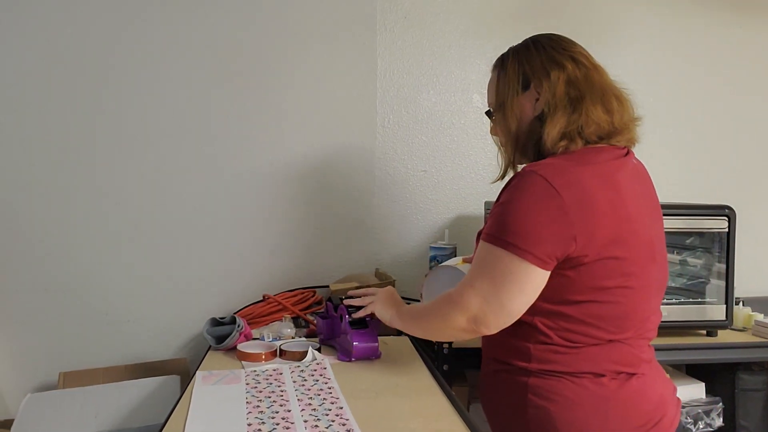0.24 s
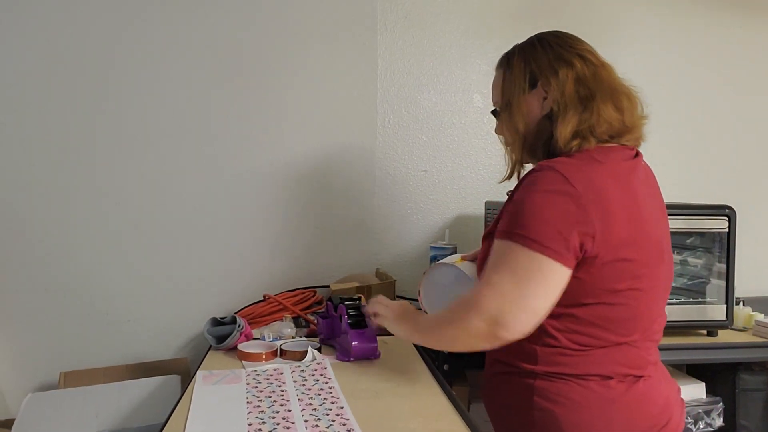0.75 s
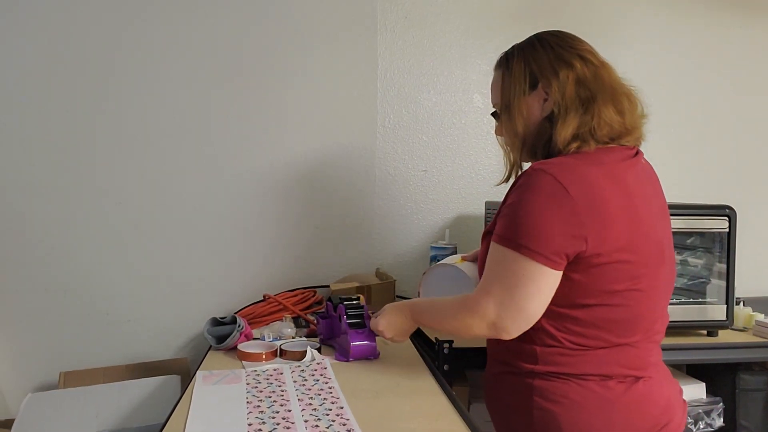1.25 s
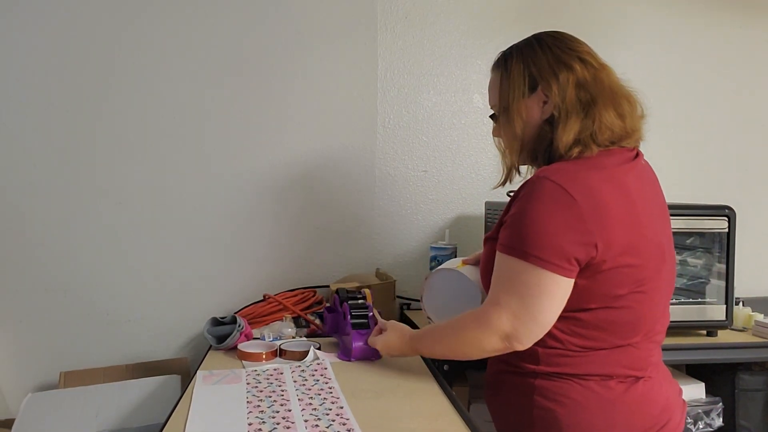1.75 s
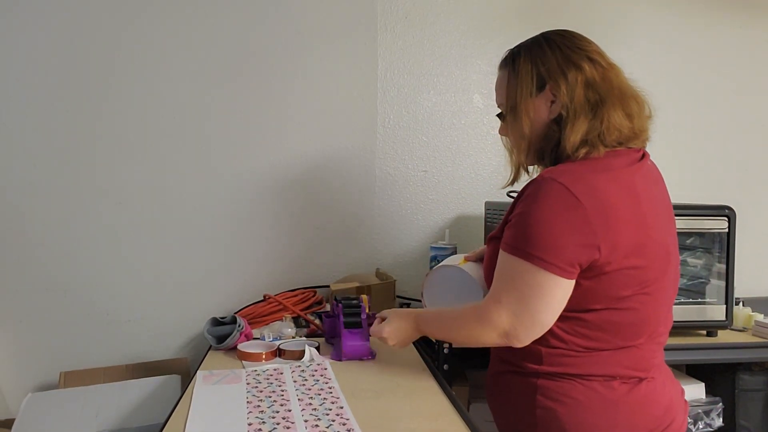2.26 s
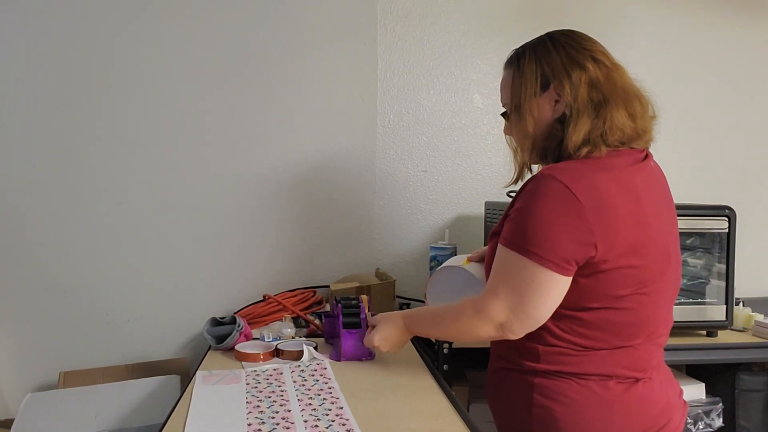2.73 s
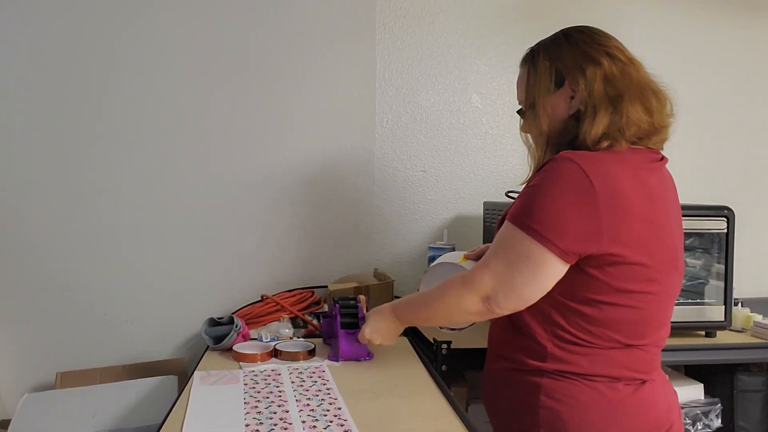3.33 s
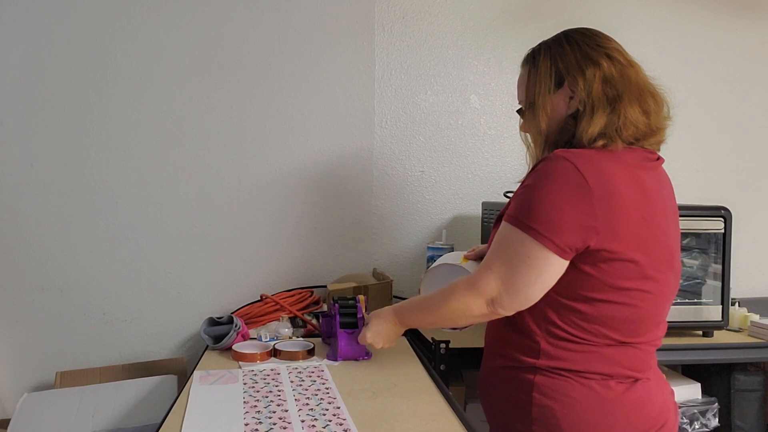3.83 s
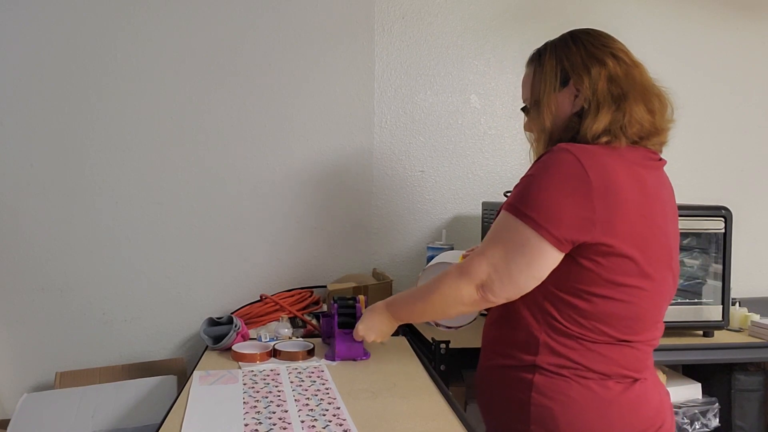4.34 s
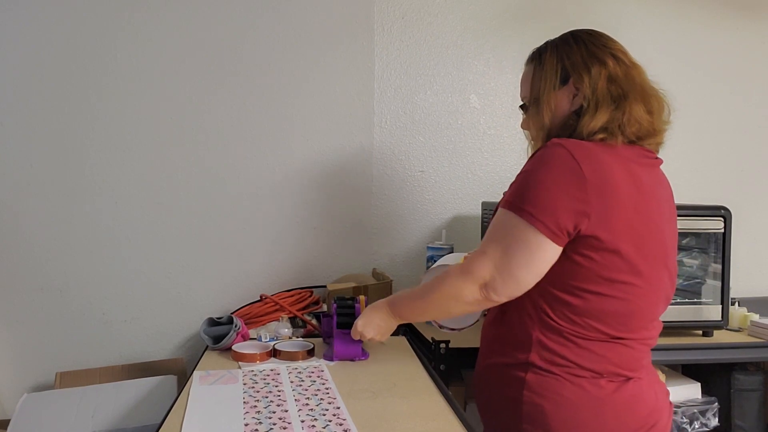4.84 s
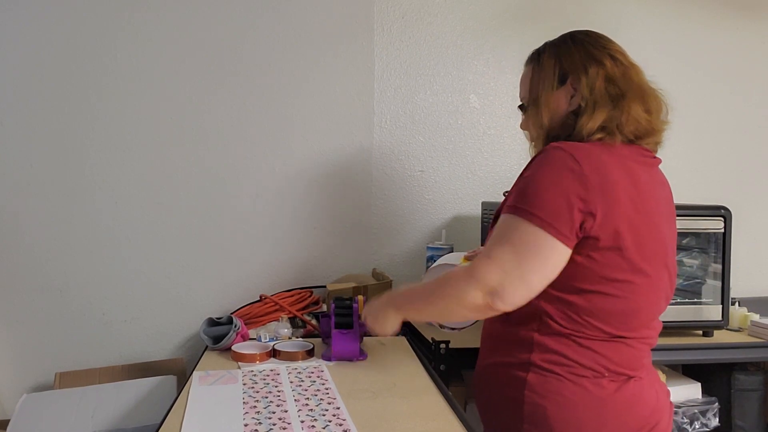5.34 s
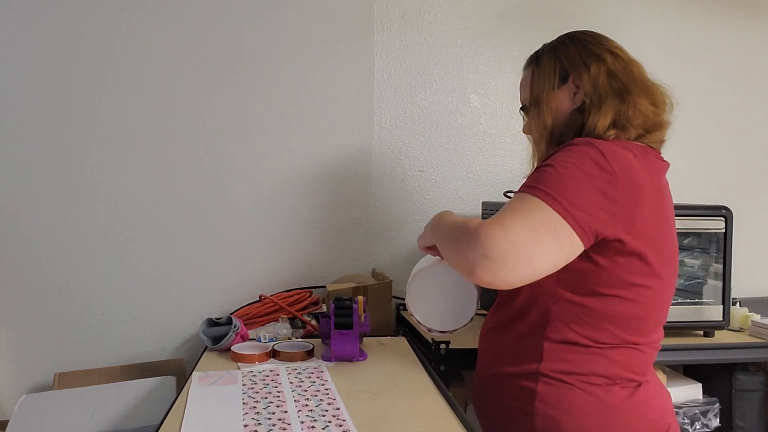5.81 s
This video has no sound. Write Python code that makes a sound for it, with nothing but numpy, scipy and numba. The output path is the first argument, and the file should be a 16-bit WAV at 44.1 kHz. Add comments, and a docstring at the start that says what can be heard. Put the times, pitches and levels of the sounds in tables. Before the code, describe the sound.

Sticky tape comes off a plastic dispenser in two short rasping pulls, the second longer and rougher. The dispenser drops back onto the desk with a sharp knock. Faint ticks and rubs follow as the taut strip works against the blade, then it tears off and the dispenser rattles with a low thud. A stereo microphone sits near the desk in a small bare room with a low appliance hum.

```python
"""Tape dispenser on a desk

A small bare room, a stereo microphone near the desk, a low appliance hum underneath. Sticky tape
comes off a plastic dispenser in two pulls, rasping as the glue sticks and slips. The dispenser tips
and drops back; the taut strip ticks and rubs on the blade, then tears off, and the dispenser rattles."""
import sys
import numpy as np
from scipy import signal
from scipy.fft import rfft, irfft
from scipy.io import wavfile
from scipy.ndimage import uniform_filter1d
from numba import njit

SR = 44100
rng = np.random.default_rng(int(sys.argv[2]) if len(sys.argv) > 2 else 0)


def file_out(sig):
    """Save sig as 16-bit WAV at sys.argv[1]."""
    # one column per channel
    cols = np.atleast_2d(sig).T
    # limit, then scale
    lim = np.clip(cols, -1, 1)
    pcm = np.round(lim * 32767).astype(np.int16)
    wavfile.write(sys.argv[1], SR, pcm)


N = 267854
TIME = np.arange(N) / SR


def undb(db):
    """Decibels to gain."""
    return 10 ** (np.asarray(db) / 20)


def unit(x):
    """Scale to rms 1."""
    return x / np.sqrt(np.mean(x ** 2) + 1e-30)


def read(points, hz):
    """Interpolate a (frequency, value) table on a log-frequency axis."""
    f, value = np.transpose(points)
    return np.interp(np.log(hz + 1), np.log(f), value)


def add(track, s, sound):
    """Mix a sound into a track from time s."""
    start = int(s * SR)
    sound, start = sound[max(-start, 0):], max(start, 0)
    track[start:start + len(sound)] += sound[:N - start]


def wander(count, hz):
    """A random drift that turns about hz times a second."""
    return np.interp(np.arange(count) * hz / SR, np.arange(4096), rng.standard_normal(4096))


def minimum_phase(power):
    """The promptest impulse response that has this power spectrum."""
    cepstrum = irfft(np.log(power + 1e-30) / 2)
    half = len(cepstrum) // 2
    cepstrum[1:half] *= 2
    cepstrum[half + 1:] = 0
    return irfft(np.exp(rfft(cepstrum)))


def whiten(burst):
    """Take the chance colour out of a burst of noise."""
    power = uniform_filter1d(np.abs(rfft(burst)) ** 2, 9)
    return unit(irfft(rfft(burst) * rfft(minimum_phase(1 / power))))


def body(spectrum, modes=(), modes_db=0):
    """Impulse response of a broad spectrum with resonances standing out of it."""
    hz = np.fft.rfftfreq(8192, 1 / SR)
    peaks = sum(undb(db) ** 2 / (1 + (2 * (hz - f) / width) ** 2) for f, width, db in modes)
    return minimum_phase(undb(read(spectrum, hz)) ** 2 + undb(modes_db) ** 2 * peaks)


def excite(drive, response, db, bass_db, treble_db, bass_hz=900, treble_hz=4500):
    """A drive rings a body; the firmness of the contact sets bass and treble relative to the middle."""
    sound = signal.fftconvolve(drive, response)[:len(drive)]
    bands = [(bass_hz, "low"), ([bass_hz, treble_hz], "band"), (treble_hz, "high")]
    filters = [signal.butter(4, hz, kind, fs=SR, output="sos") for hz, kind in bands]
    bass, middle, treble = [unit(signal.sosfilt(sos, sound)) for sos in filters]
    return undb(db) * (undb(bass_db) * bass + middle + undb(treble_db) * treble)


@njit
def resonate(x, hz, q):
    """State-variable band-pass with a moving centre."""
    out, band, low = np.empty(len(x)), 0., 0.
    for i in range(len(x)):
        g = np.tan(np.pi * hz[i] / SR)
        v = (band + g * (x[i] - low)) / (1 + g * (g + 1 / q))
        band, low, out[i] = 2 * v - band, low + 2 * g * v, v / q
    return out


# Diffuse sound at the microphone, left against right: f/Hz, likeness/0-1
LIKENESS = [(60, 0.91), (150, 1), (300, 0.8), (700, 0.49), (1500, 0.37), (3000, 0.083), (7000, 0.064)]
def diffuse(pair):
    """Two unrelated noises become left and right of a diffuse field, alike in the bass."""
    count = pair.shape[1]
    like = read(LIKENESS, np.fft.rfftfreq(count, 1 / SR))
    mid, side = irfft(rfft(pair) * np.sqrt([1 + like, 1 - like]), count)
    return unit(np.array([mid + side, mid - side]))


# Appliance hum, centred between the channels: f/Hz, level/dB
HUM_TONES = [(49, -60.5), (74.5, -70), (120, -68), (220, -78.5)]
# Air all around the microphone: f/Hz, relative level/dB
AIR_SPECTRUM = [(25, -18.5), (50, 0), (80, -4.5), (130, -15), (200, -14.5), (300, -20.5), (450, -26),
                (700, -32.5), (1500, -40), (3000, -41.5), (7500, -51), (15000, -40)]
def room_tone(air_db=-63, waver_rad=0.36):
    """A steady low appliance hum over faint air noise."""
    colour = undb(read(AIR_SPECTRUM, np.fft.rfftfreq(N, 1 / SR)))
    air = irfft(rfft(rng.standard_normal((2, N))) * colour, N)
    hum = sum(undb(db) * np.sqrt(2) * np.sin(2 * np.pi * hz * TIME + waver_rad * wander(N, 1.7))
              for hz, db in HUM_TONES)
    return undb(air_db) * diffuse(air) + hum


# Decay between the bare walls: f/Hz, t60/s
ROOM_DECAY = [(100, 0.6), (300, 0.28), (1000, 0.29), (2500, 0.28), (6000, 0.32), (15000, 0.24)]
def room(x, direct_db=-8, echo_db=-1, early_db=4, early_s=0.0025, onset_s=0.0039):
    """The microphone hears the direct sound, early echoes from desk and corner, then a short tail."""
    t = TIME[:SR // 2]
    hz, times, frames = signal.stft(rng.standard_normal((2, len(t))), SR, nperseg=1024)
    decay = undb(-60 * times / read(ROOM_DECAY, hz)[:, None])
    tails = signal.istft(frames / np.abs(frames) * decay, SR)[1][:, :len(t)]
    tails *= (1 + undb(early_db) * np.exp(-t / early_s)) * np.minimum(t / onset_s, 1)
    response = undb(echo_db) * diffuse(tails) / np.sqrt(len(t))
    response[0, 0] += undb(direct_db)
    response[1, 1] += undb(direct_db)
    response[1] = np.roll(response[1], 1)  # the desk is nearer to the left port
    return signal.oaconvolve(x[None], response, axes=1)[:, :N]


def ringing(modes, strikes, rattle=0.15, rise_cycles=1.2):
    """Modes build up and outlast each (t/s, level/dB) strike; loose contact makes them flutter."""
    out, t = np.zeros(N), TIME[:SR // 2]
    for s, strike_db in strikes:
        for hz, db, t60 in modes:
            flutter = rattle * wander(len(t), hz / 30)
            rise = 1 - np.exp(-(hz * t / rise_cycles) ** 2)
            envelope = rise * undb(strike_db + db - 60 * t / t60)
            add(out, s, envelope * (1 + flutter) * np.sin(2 * np.pi * hz * t + flutter))
    return out


# A small hard part, faint at the microphone: f/Hz, level/dB, t60/s
PING_MODES = [(2046, -62, 0.4), (2617, -56.5, 0.85), (2670, -61.5, 0.49), (3675, -56.5, 0.64),
              (4371, -62.5, 0.59), (5760, -52.5, 0.2)]
def ping():
    """A small hard part rings out at the very start."""
    return ringing(PING_MODES, [(0.0035, 0)], rattle=0.67)


def zing(start_s=5.297):
    """A thin, very high ring as the dispenser rattles back."""
    return ringing([(13700, -32.5, 0.13), (15300, -35, 0.12)], [(start_s, 0)])


# Fingers, tape and dispenser sliding at the desk: t/s, length/s, level/dB, bass/dB, treble/dB
RUB_STROKES = [(-0.03, 0.088, -48.5, -10.5, 4.5), (0.07, 0.2, -63, 4, -16), (0.385, 0.089, -53.5, -11, -6),
               (1.294, 0.15, -67, 1, 5.5), (2.262, 0.18, -47, -29, -2.5), (2.461, 0.16, -84.5, 13.5, -16),
               (3.135, 0.12, -53, -8, 5.5), (3.427, 0.09, -52, 0, 8), (3.895, 0.12, -83, 16, -20.5),
               (4.182, 0.2, -77, 11.5, -12), (4.406, 0.21, -64.5, 2, -0.5), (4.721, 0.15, -80.5, 7, 0.5),
               (5.212, 0.18, -40, 5, 1)]
# Colour of that friction: f/Hz, relative level/dB
RUB_SPECTRUM = [(240, -44), (400, -6.5), (605, -14), (772, -4), (860, -12), (1220, -9.5), (1560, -3.5),
                (3410, 0), (15500, -2)]
def rubbing(grain_db=3, fade_db=-16, swell_share=0.3):
    """Dense tiny catches of skin and film sliding on plastic; each stroke swells and fades."""
    out, response = np.zeros(N), body(RUB_SPECTRUM)
    for start, length, db, bass_db, treble_db in RUB_STROKES:
        t = np.arange(0, length, 1 / SR)
        catches = rng.standard_normal(len(t)) * undb(grain_db * wander(len(t), 400))
        swell_db = np.interp(t, [0, swell_share * length, length], [fade_db, 0, fade_db])
        add(out, start, excite(catches, response, db + swell_db, bass_db, treble_db))
    return out


def blows(events, response, chatter_s, ring_db, ring_q):
    """Each blow is a quickly dying chatter of tiny contacts; where it lands picks out one resonance."""
    out, t = np.zeros(N), TIME[:8192]
    for s, db, bass_db, treble_db, hz in events:
        chatter = whiten(rng.standard_normal(len(t)) * np.exp(-t / chatter_s))
        ring = undb(ring_db) * resonate(chatter, np.full(len(t), float(hz)), ring_q)
        add(out, s, excite(chatter + ring, response, db, bass_db, treble_db))
    return out


# Ticks at the blade and shell: t/s, level/dB, bass/dB, treble/dB, strip f/Hz
STRIP_TICKS = [(0.338, -50, -19.5, -8.5, 1950), (0.7415, -39.5, -15, -2.5, 3330),
               (3.0067, -59, -9, -3.5, 2190), (3.151, -71, -8.5, 15, 2120), (3.464, -43, -12.5, 0, 2120),
               (3.5872, -48.5, -18.5, -5.5, 1640), (4.0481, -74, 1, 11, 1980),
               (4.162, -78.5, 6.5, -3, 1860), (4.2512, -57.5, -13, 10.5, 1770),
               (4.5158, -46.5, -20, 1, 2080), (4.578, -56, -7.5, 0, 1780), (5.0734, -53.5, -14, 5, 1670),
               (5.1297, -38.5, -13, -1, 1540)]
# Colour of a tick: f/Hz, relative level/dB
TICK_SPECTRUM = [(300, -22), (750, -13.5), (1100, -16.5), (1650, -6.5), (2200, -2), (2550, -7),
                 (3100, -1.5), (4300, -11), (5900, -5), (8000, -12), (11500, -7), (15500, -7.5)]
# Resonances in a tick: f/Hz, width/Hz, relative level/dB
TICK_MODES = [(1770, 140, 7.5), (2090, 45, 5), (3140, 88, 6.5), (5650, 55, -17.5), (6300, 130, -4.5),
              (11590, 130, -17)]
def ticking():
    """The taut strip ticks against the blade and the shell."""
    response = body(TICK_SPECTRUM, TICK_MODES, modes_db=-7.5)
    return blows(STRIP_TICKS, response, chatter_s=0.003, ring_db=5, ring_q=10.0)


# Knocks of the dispenser on the desk, and snaps and snags of the tape as it pulls loose or tears on the blade:
# t/s, level/dB, bass/dB, treble/dB, shell f/Hz
KNOCKS = [(0.4487, -49.5, -7.5, 2, 2280), (0.4837, -57, 4, -16.5, 870),
          (0.7856, -36.5, -9.5, -9, 1260), (0.8406, -68.5, 16, -28, 710), (1.3203, -79, 9.5, -11, 790),
          (1.3525, -67.5, -7, -22, 1101), (1.419, -53, -13, -6.5, 2103), (1.509, -37, -10, -1, 1470),
          (1.9929, -27.5, -3, -5.5, 1120), (2.004, -44, 7, -6.5, 736), (2.0281, -33.5, -8.5, -8, 740),
          (2.4016, -68.5, -1, -25, 1129), (3.0582, -66.5, -3.5, 1.5, 1838),
          (3.2737, -62, -2.5, -23.5, 1910), (3.4364, -50, -3, -9, 1630),
          (4.9178, -71, -4.5, -13.5, 789), (4.9404, -62, -0.5, -1, 940),
          (5.1831, -33.5, -14, -14.5, 1460), (5.215, -36.5, 1, -17.5, 775),
          (5.2333, -28.5, -6, -8, 746), (5.2965, -39, -2.5, -10, 934), (5.3469, -43, -11, -27, 650)]
# Colour of a knock: f/Hz, relative level/dB
KNOCK_SPECTRUM = [(25, -50.5), (65, -24.5), (115, -20), (200, -15), (330, -11), (450, -15.5), (720, -10),
                  (1020, -9.5), (1320, -5), (2000, -2), (3000, -14), (4500, -15), (8000, -22.5),
                  (15500, -22)]
# Dispenser and desk ringing together, also under the tape: f/Hz, width/Hz, relative level/dB
DESK_MODES = [(259.4, 10, -13), (658, 90, -5.5), (825, 38, 2.5), (910, 17, -9.5), (1210, 45, -4),
              (1298, 32, -2.5), (1420, 50, 0.5), (1600, 24, -4.5), (1780, 51, -1.5), (2180, 90, 2),
              (2600, 220, -2.5), (2410, 230, -3), (2930, 150, 3.5), (6000, 19, -8.5)]
# Boom of the desk top: f/Hz, level/dB relative to the knock's bass, t60/s
BOOM_MODES = [(185, -2, 0.18), (264.3, -1, 0.15)]
def knocking():
    """The plastic shell knocks on the desk and the tape snaps and snags against it; the bass of each knock
    booms in the desk top."""
    response = body(KNOCK_SPECTRUM, DESK_MODES, modes_db=-5)
    knocks = blows(KNOCKS, response, chatter_s=0.008, ring_db=-5, ring_q=8.34)
    booms = ringing(BOOM_MODES, [(s, db + bass_db) for s, db, bass_db, _, _ in KNOCKS])
    return knocks + booms


# Low modes of the whole desk: f/Hz, level/dB, t60/s
SHUDDER_MODES = [(48.1, -37.5, 0.2), (74, -35, 0.35)]
def shudder(start_s):
    """The whole desk shudders when the tape gives way."""
    return ringing(SHUDDER_MODES, [(start_s, 0)])


@njit
def stick_slip(hz, rough, rate_scatter, size_scatter):
    """One pulse per slip; rough peeling scatters their spacing and size."""
    pulses, phase, slip = np.zeros(len(hz) + 1), 0., 0
    for i in range(len(hz)):
        step = hz[i] * np.exp(rough[i] * rate_scatter[slip]) / SR
        phase += step
        if phase >= 1:
            phase, slip = phase - 1, slip + 1
            size = np.exp(rough[i] * size_scatter[slip])
            share = min(phase / step, 1.)  # the slip falls between two samples
            pulses[i] += size * share
            pulses[i + 1] += size * (1 - share)
    return pulses[:-1] / np.sqrt(hz)


# Colour of the tape, peeling or tearing: f/Hz, relative level/dB
RASP_SPECTRUM = [(30, -25.5), (75, -6), (170, -17), (300, -15.5), (470, -10.5), (720, -6), (1300, -3),
                 (2000, -0.5), (3200, -5), (4000, -9), (5100, -8), (5900, -11), (8300, -14.5), (9500, -4.5),
                 (10600, -11.5), (15500, -11.5)]
def rasp(slip_hz, rough, strip_hz, db, bass_db, treble_db, strip_db=1, strip_q=7.0, fizz_db=-16):
    """Uneven slips shake the free strip at its resonance and ring dispenser and desk."""
    rate_scatter, size_scatter = rng.standard_normal((2, N // 10))
    fizz = undb(fizz_db) * rng.standard_normal(len(slip_hz))
    slips = unit(stick_slip(slip_hz, rough, rate_scatter, size_scatter)) + fizz
    slips *= undb(3.5 * wander(len(slips), 200))  # the glue holds unevenly
    strip = undb(strip_db) * resonate(slips, strip_hz, strip_q)
    response = body(RASP_SPECTRUM, DESK_MODES, modes_db=-3.5)
    return excite(slips + strip, response, db, bass_db, treble_db)


def tearing(start_s, end_s, slip_hz=598, rough=0.15):
    """The teeth of the blade cut across the strip, louder and louder, as it loosens and drops in pitch."""
    out, count = np.zeros(N), int((end_s - start_s) * SR)
    tear = rasp(np.full(count, slip_hz), np.full(count, rough), strip_hz=np.geomspace(1910, 1100, count),
                db=np.linspace(-37, -33, count), bass_db=-5, treble_db=-10.5)
    add(out, start_s, tear)
    return out


def hand_speed(t, start, full, stop, creep, grip_s=0.009, sag_s=0.41, stop_s=0.014, rest=0.13):
    """The hand grips, creeps, gathers pace, slows as the arm stretches, and stops; 1 is full speed."""
    gather = creep + (1 - creep) * np.clip((t - start) / (full - start), 0, 1) ** 3.6
    sag = np.exp(-(np.maximum(t - full, 0) / sag_s) ** 2)
    grip = np.interp(t, [start, start + grip_s, stop, stop + stop_s], [rest, 1, 1, rest])
    return gather * sag * grip


# Pulls off the roll, near the microphone: start t/s, full-speed t/s, stop t/s, creep speed/0-1,
# then at full speed: level/dB, slip f/Hz, roughness/0-1, bass/dB
TAPE_PULLS = [(0.505, 0.618, 0.684, 0.33, -26, 468.5, 0.22, -5),
              (1.412, 1.563, 1.881, 0.46, -26, 660.3, 0.48, -10)]
def peeling(strip_hz=4300, louder_db=7, brighter_db=4, settle_s=0.04):
    """Glue slips off the roll; the faster the hand, the louder, brighter and rougher the rasp."""
    out = np.zeros(N)
    for start, full, stop, creep, db, slip_hz, rough, bass_db in TAPE_PULLS:
        t = np.arange(start, stop + settle_s, 1 / SR)
        speed = hand_speed(t, start, full, stop, creep)
        doublings = np.log2(speed)
        pull = rasp(slip_hz * speed ** 0.1, rough * speed ** 1.4, strip_hz * speed ** 1.4,
                    db + louder_db * doublings, bass_db, treble_db=brighter_db * doublings - 2)
        add(out, start, pull)
    return out


def scene():
    """Tape, base and blade each reach the microphone by their own echoes, over the room tone."""
    tear_start_s, tear_end_s = 5.14, 5.23
    tape = peeling() + tearing(tear_start_s, tear_end_s)
    base = knocking() + shudder(tear_end_s) + ping() + zing()
    blade = ticking() + rubbing()
    return room_tone() + room(blade) + room(base) + room(tape)


# Balance of the two microphone ports: f/Hz, left minus right level/dB
PORT_BALANCE = [(100, -2.5), (350, -2.5), (1000, 1.26), (3000, -0.07), (8000, 0), (14000, 3.5)]
def record(dry, top_hz=15850):
    """The two microphone ports differ in colour; the top is cut steeply."""
    balance_db = read(PORT_BALANCE, np.fft.rfftfreq(N, 1 / SR))
    ports = irfft(rfft(dry) * undb(np.outer([.5, -.5], balance_db)), N)
    return signal.sosfilt(signal.ellip(10, .2, 70, top_hz, fs=SR, output="sos"), ports)


dry = scene()
out = record(dry)
file_out(out)
```